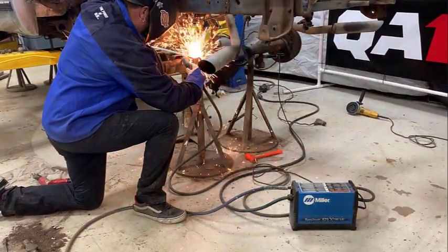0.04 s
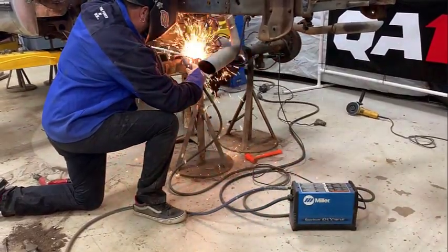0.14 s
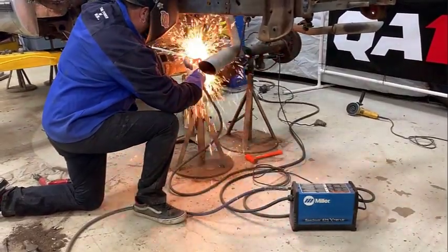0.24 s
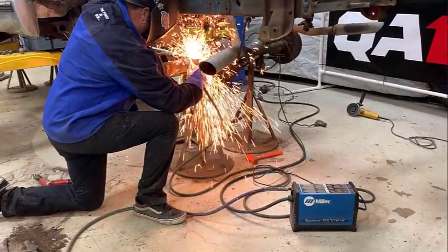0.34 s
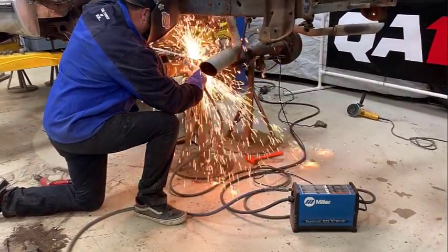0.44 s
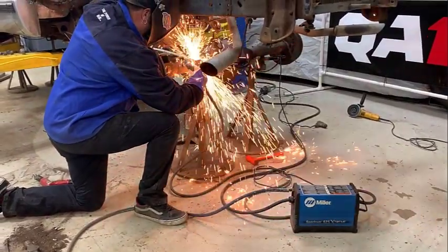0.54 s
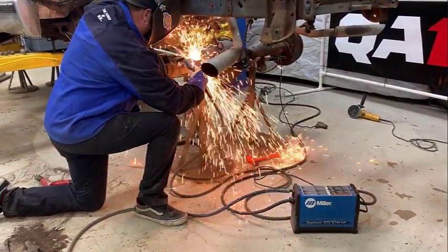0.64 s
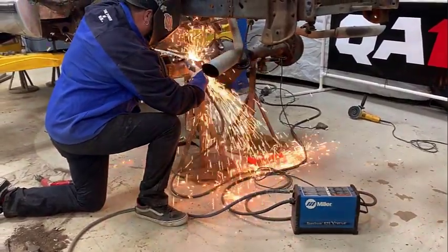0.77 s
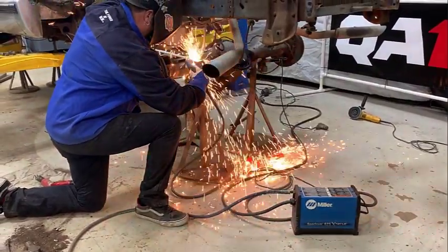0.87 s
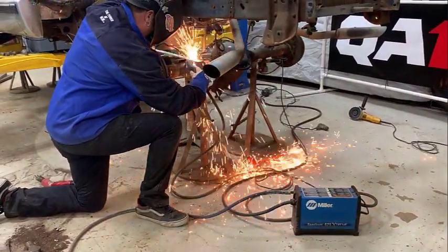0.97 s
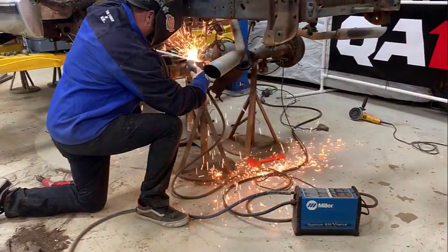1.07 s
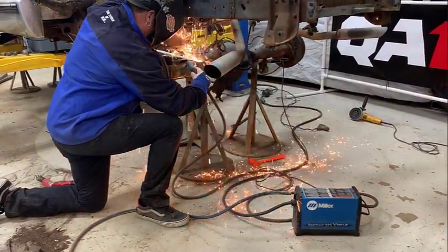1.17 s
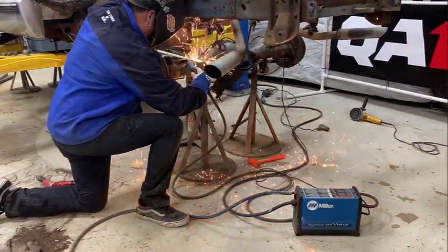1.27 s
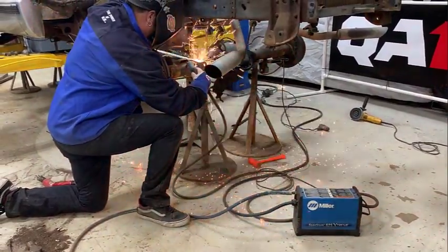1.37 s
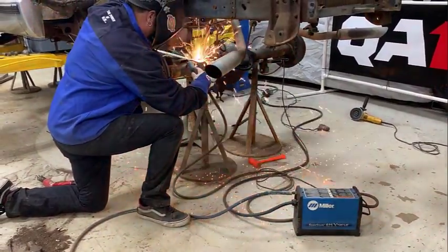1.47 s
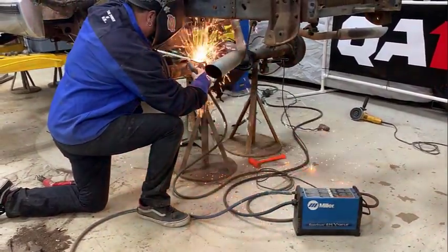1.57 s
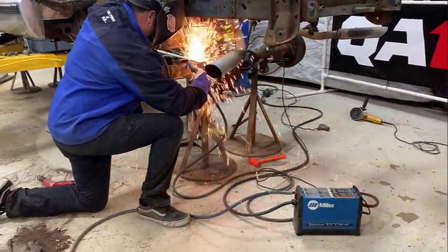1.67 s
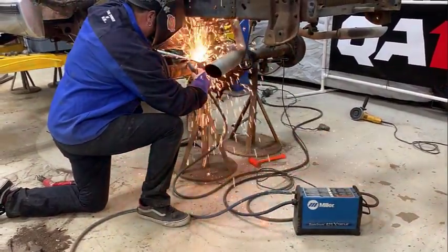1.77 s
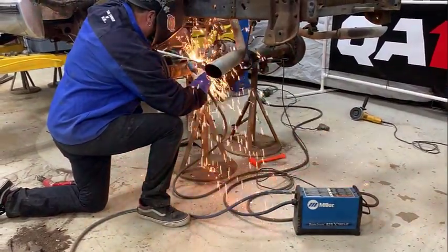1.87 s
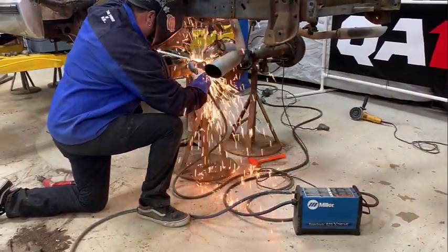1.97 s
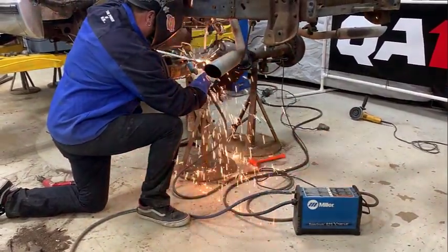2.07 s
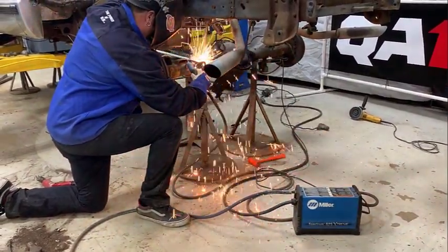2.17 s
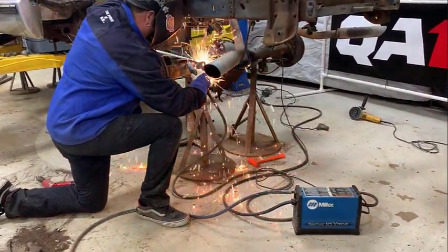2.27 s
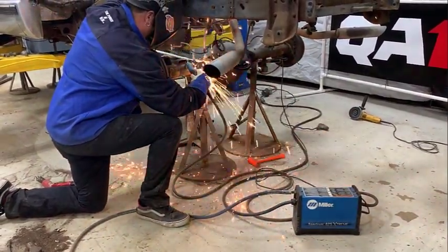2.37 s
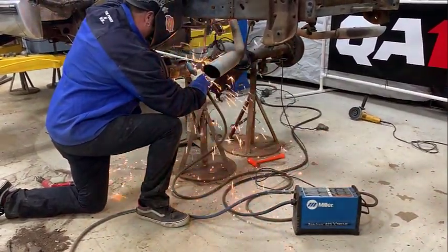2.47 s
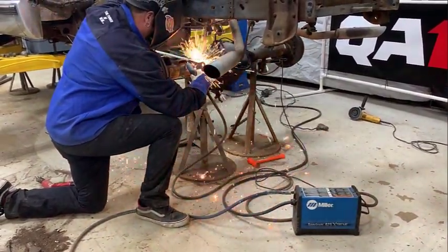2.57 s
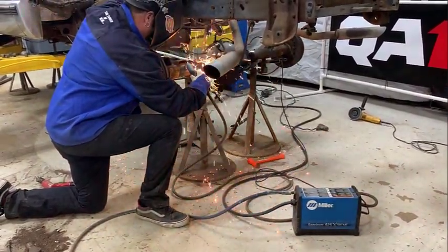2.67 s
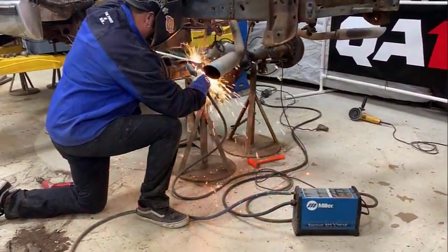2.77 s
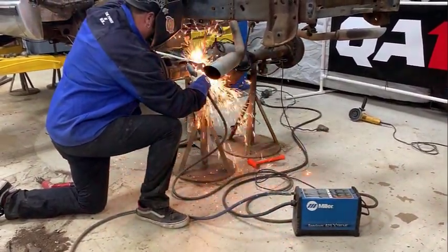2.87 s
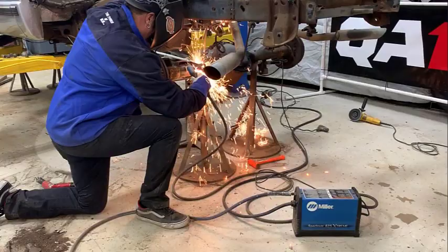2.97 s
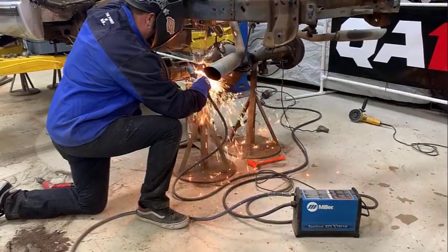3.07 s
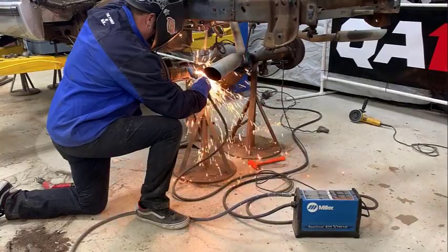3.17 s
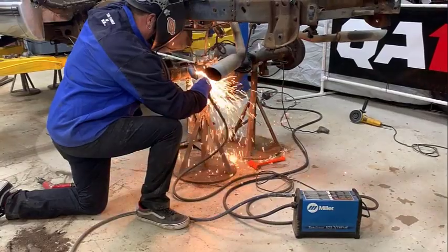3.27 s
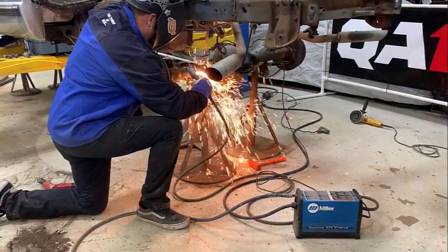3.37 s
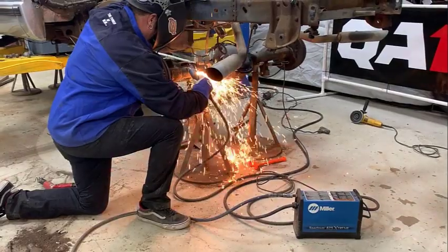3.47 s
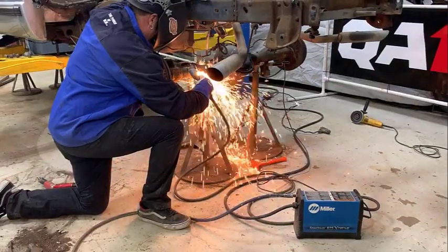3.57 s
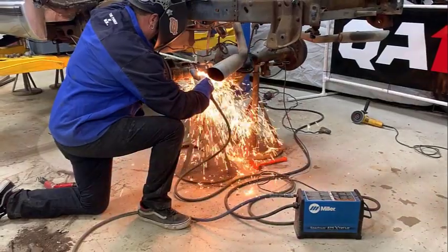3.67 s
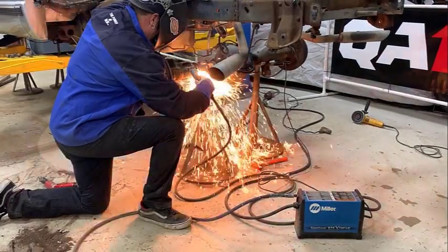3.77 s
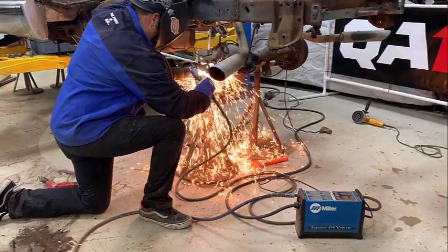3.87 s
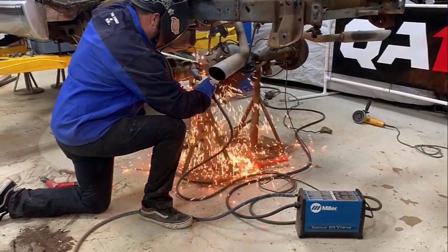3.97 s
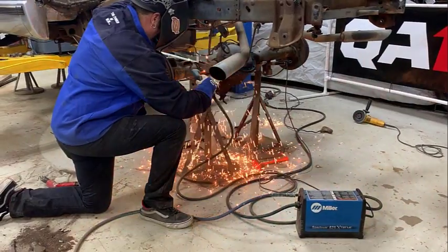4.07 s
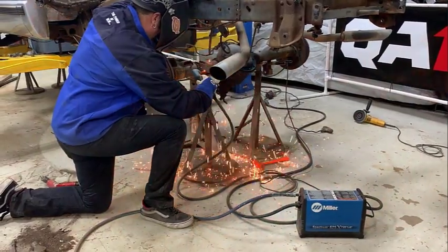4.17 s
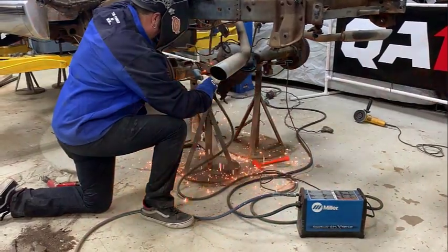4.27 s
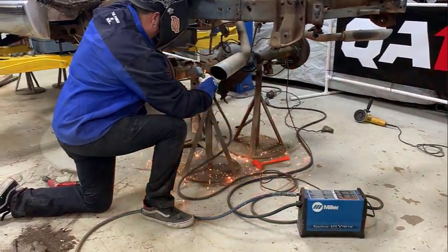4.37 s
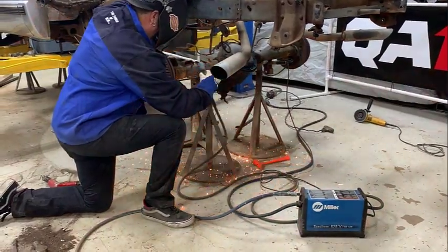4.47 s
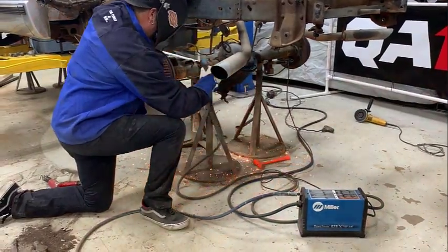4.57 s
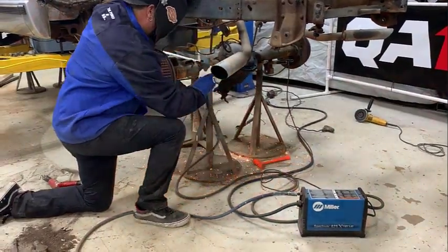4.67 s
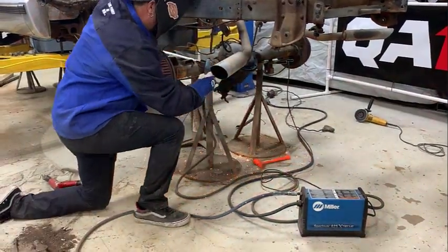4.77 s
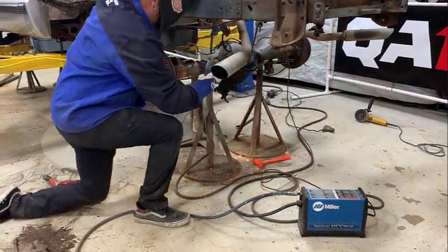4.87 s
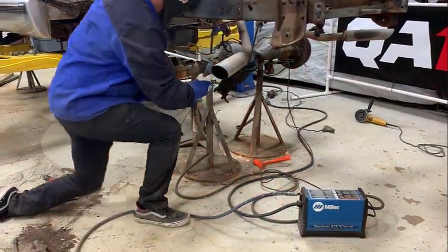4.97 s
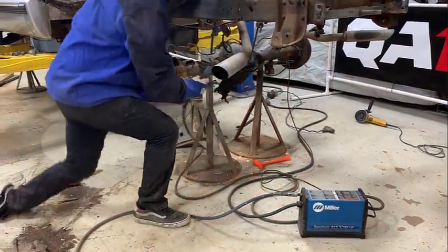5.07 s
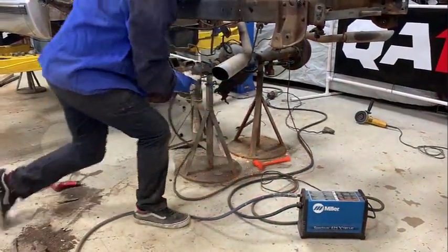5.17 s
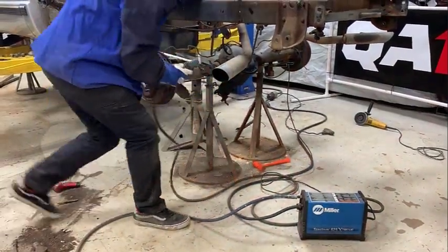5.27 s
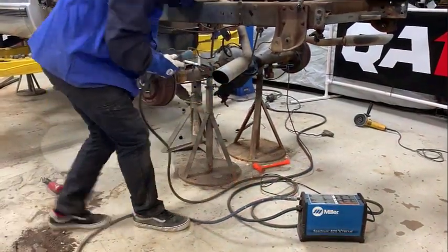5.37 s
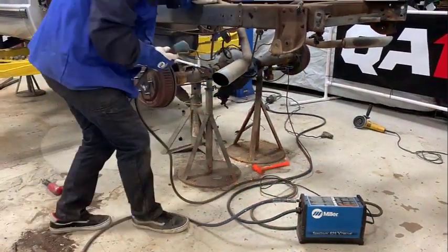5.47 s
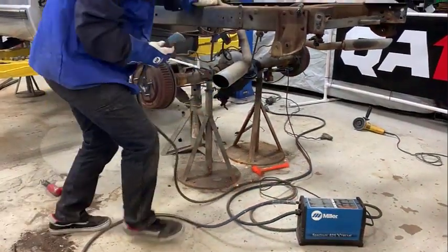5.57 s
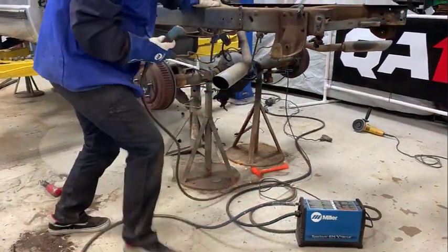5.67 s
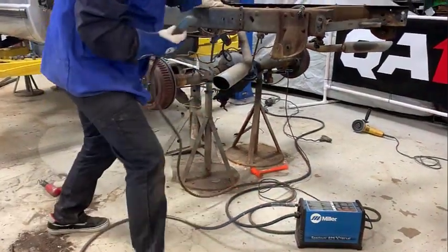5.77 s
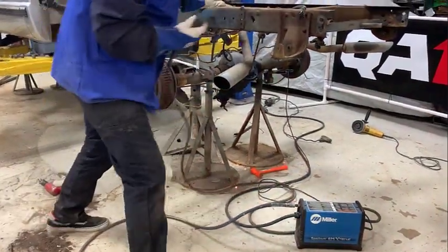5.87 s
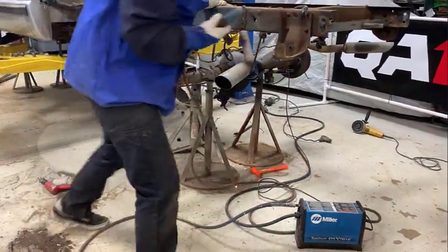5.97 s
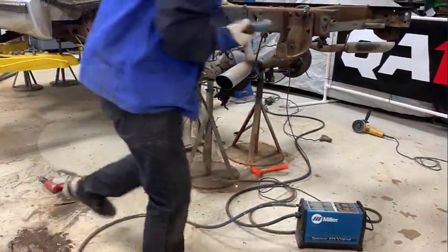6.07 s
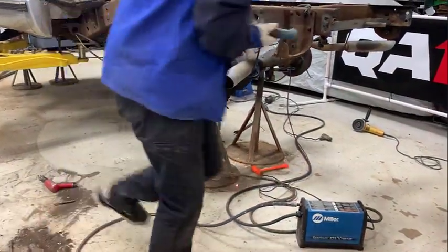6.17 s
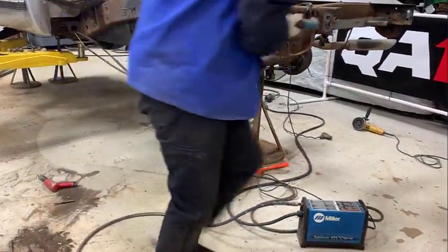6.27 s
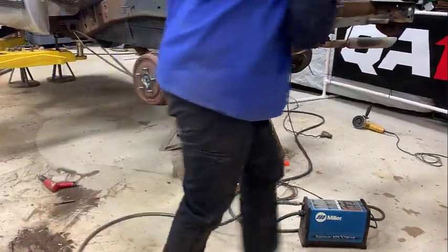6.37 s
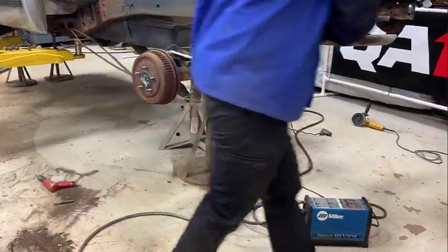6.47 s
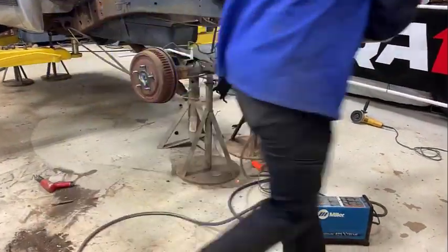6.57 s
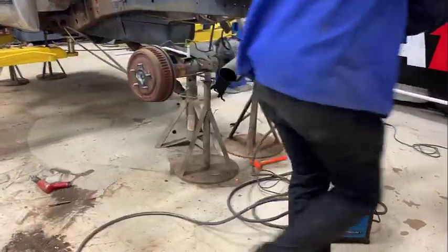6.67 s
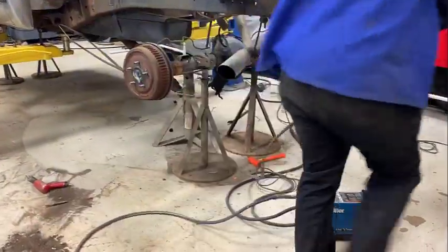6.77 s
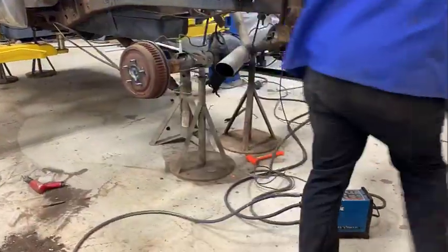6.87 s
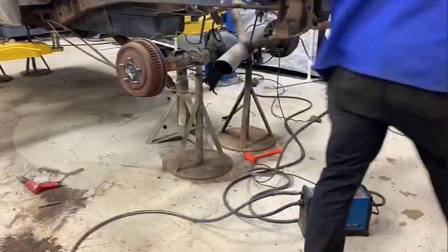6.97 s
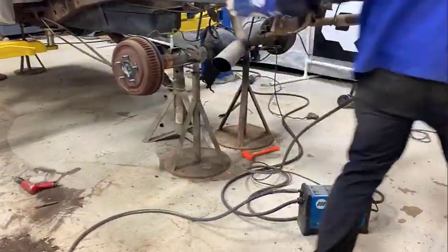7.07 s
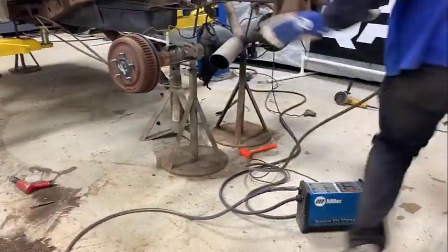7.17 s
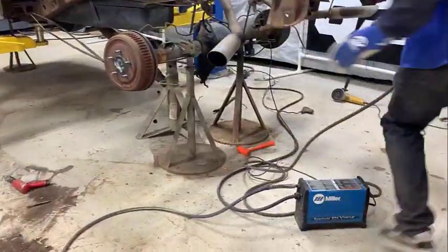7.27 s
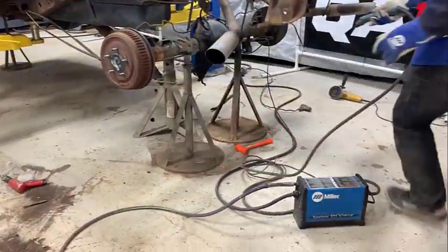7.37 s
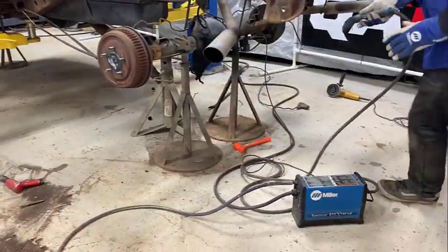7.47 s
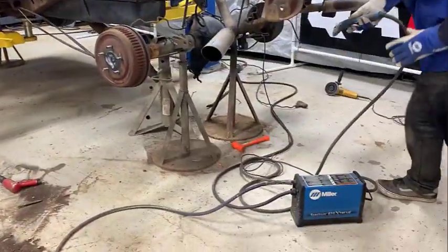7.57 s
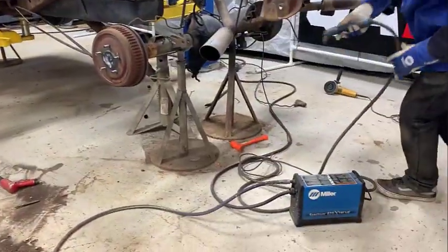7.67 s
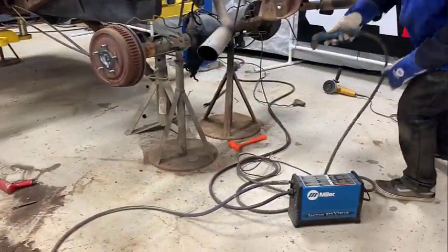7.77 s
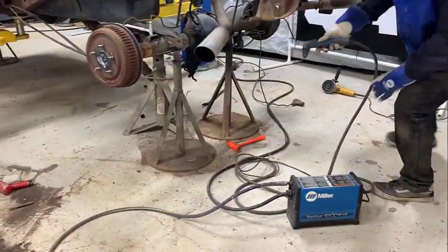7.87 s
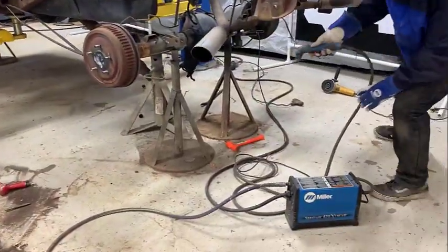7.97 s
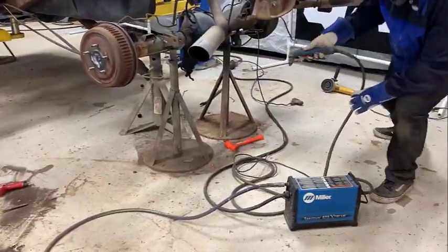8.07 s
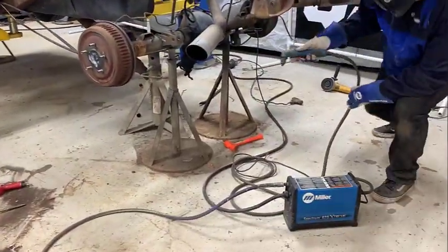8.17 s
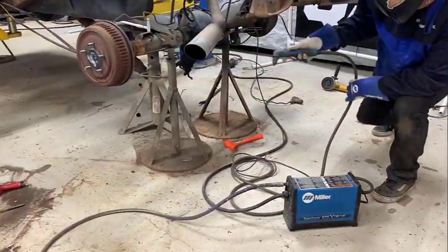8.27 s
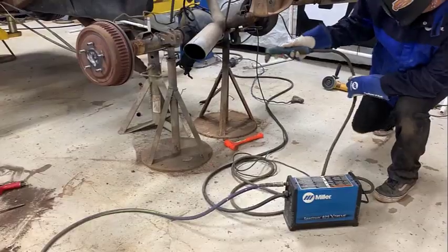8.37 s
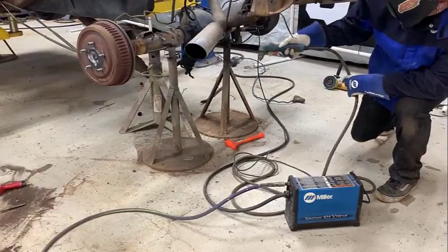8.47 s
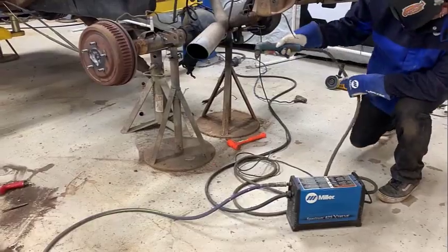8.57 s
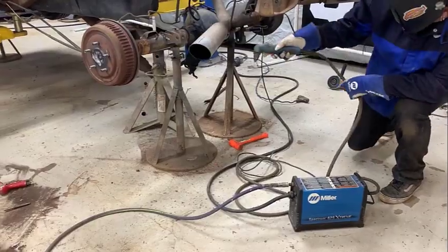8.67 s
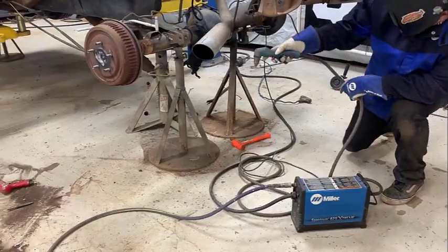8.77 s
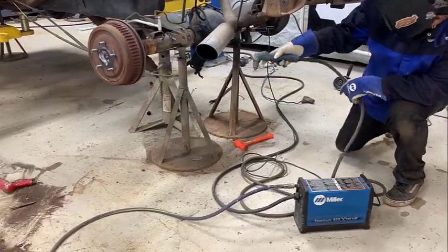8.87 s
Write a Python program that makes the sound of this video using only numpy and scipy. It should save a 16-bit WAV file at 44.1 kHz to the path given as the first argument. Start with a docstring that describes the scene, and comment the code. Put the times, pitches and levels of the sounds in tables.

```python
"""A plasma arc roars through steel over a compressor's hum, a fan's whine and the rush of machines in a workshop.
It growls, snaps off and rings out in the hall; hose air hisses until a valve shuts, then cooling air hisses
as the torch is lifted off and carried past. Jets are noise through changing filters; compressor and fan are sines,
the machines shaped noise, the arc break and thuds damped tones. Both channels carry the same signal."""
import sys
import numpy as np
from scipy import signal
from scipy.fft import rfft, irfft
from scipy.io import wavfile
from scipy.ndimage import uniform_filter1d

SR = 44100
rng = np.random.default_rng(int(sys.argv[2]) if len(sys.argv) > 2 else 0)


def generate_wav(sig):
    """Save sig (samples, or channels by samples) to the path in sys.argv[1] as 16-bit PCM at SR."""
    pcm = np.round(np.clip(np.atleast_2d(sig).T, -1, 1) * 32767).astype(np.int16)
    wavfile.write(sys.argv[1], SR, pcm)


N = 393813
ARC_OFF_S = 4.0


def from_db(db):
    """Amplitude gain of a level in dB."""
    return 10 ** (np.asarray(db) / 20)


def rms_one(x):
    """Scale to rms 1."""
    return x / np.sqrt(np.mean(x ** 2) + 1e-20)


def in_time(rows, t=None):
    """Columns of a time table, interpolated sample by sample or at times t."""
    times_s, *columns = np.transpose(rows)
    at_s = np.arange(N) / SR if t is None else t
    return [np.interp(at_s, times_s, column) for column in columns]


def at_hz(points, hz):
    """Spectrum in dB, interpolated on a log frequency axis."""
    points_hz, points_db = np.array(points)[:, 0], np.array(points)[:, 1]
    return np.interp(np.log(hz + 1), np.log(points_hz), points_db)


def drift(rate_hz):
    """Slow random wander of spread 1: noise through a two-pole lowpass, run at SR / 40."""
    step, settle = 40, 2000
    pole = np.exp(-2 * np.pi * rate_hz * step / SR)
    noise = rng.standard_normal(N // step + settle + 2)
    slow = signal.lfilter([1], [1, -2 * pole, pole * pole], noise)[settle:]
    slow = rms_one(slow - slow.mean())
    return np.interp(np.arange(N) / step, np.arange(len(slow)), slow)


def resonance(hz, centre_hz, width_hz):
    """Power response of a resonance passed twice."""
    return 1 / (1 + (2 * (hz - centre_hz) / width_hz) ** 2) ** 2


def lifts_db(events, hz, t):
    """Brief swells (or dips, if negative) of single bands."""
    total_db = 0
    for centre_s, length_s, centre_hz, width_hz, db in events:
        swell = np.exp(-(2 * (t - centre_s) / length_s) ** 2)
        total_db = total_db + db * swell * resonance(hz, centre_hz, width_hz)
    return total_db


def coloured(colour_db, patchy_db, streaky_db):
    """White noise of rms 1 through a changing filter colour_db(Hz, s); eddies make broad short patches,
    slowly shifting echoes from nearby steel make narrow long streaks."""
    window, hop = 1024, 256  # samples
    hz, t, z = signal.stft(rng.standard_normal(N), SR, nperseg=window, noverlap=window - hop)

    def field(bins, frames):
        noise = uniform_filter1d(rng.standard_normal(z.shape), bins, axis=0)
        return rms_one(uniform_filter1d(noise, frames, axis=1))

    chance_db = patchy_db * field(bins=24, frames=16) + streaky_db * field(bins=4, frames=120)
    gain = from_db(colour_db(hz[:, None], t[None]) + chance_db)
    return signal.istft(z * gain, SR, nperseg=window, noverlap=window - hop)[1][:N]


def jet():
    """Turbulent hiss whose resonances change strength as the torch moves along the cut."""
    # cutting jet: (time [s], hiss before makeup [dB], roar below about 3 kHz relative to it [dB])
    cut = [(0.0, -15, -3.5), (0.2, -19, 1.5), (0.55, -20.5, 2.5), (0.77, -19, 3), (0.79, -17, 0.5),
           (0.9, -20, -2), (1.58, -19.5, 0.5), (1.82, -17, -3), (2.07, -21, -3), (2.2, -18.5, 0),
           (2.28, -22.5, 4.5), (2.74, -18.5, 0), (3.18, -23.5, 0.5), (3.24, -21.5, 1), (3.6, -25.5, -1.5),
           (3.78, -21.5, -2), (3.9, -23.5, 2.5), (3.99, -17.5, 3.5)]
    # jet bands briefly swelling, or sinking where negative:
    # (time [s], length [s], centre [Hz], width [Hz], lift [dB])
    surges = [(.09, 0.078, 4000, 600, -2), (.8, .2, 4700, 700, 3.5), (.72, .25, 7000, 700, -0.5),
              (1.76, 0.11, 3850, 900, 4.5), (1.85, 0.14, 7500, 900, 5), (2.27, 0.098, 1910, 400, 1),
              (2.3, 0.15, 1100, 150, 10), (2.9, .3, 5500, 500, -0.5)]
    # start, middle and end of the cut: time [s]
    cut_stages_s = [0.7, 2.78, 3.6]
    # steel and cavities around the torch: (centre [Hz], width [Hz], start [dB], middle [dB], end [dB])
    rings = [(587, 276, -1.5, 1, 2.5), (1020, 1540, -12.5, -11, -4.5), (1400, 420, -6, -5.5, -7),
             (1670, 290, -5, -2, 3), (1924, 180, -1.5, 3.5, 2), (2440, 530, -4.5, -2.5, 2.5),
             (3055, 280, -5, -10.5, -4), (3440, 670, -2, -1, -0.5), (3990, 380, 5.5, -1.5, -5),
             (4280, 1370, -16.5, 2.5, 1.5), (4720, 900, 0.5, -3, -25.0), (5606, 920, 2.0, 6, 6),
             (6360, 690, 1, 0.5, -1.5), (6910, 830, 3.5, 2, 2.5), (7610, 1080, 3.5, 3, 0.5),
             (8200, 570, -5, -3, -1.5), (8720, 480, -2, 1, -16), (9030, 490, -8, -10, 1),
             (9500, 650, -9, -2.5, -5), (10240, 610, 1.5, 0, 0.5), (10820, 540, 1.0, 7, 3),
             (11490, 680, 2, 1.5, 0.5), (12600, 770, -3, -15.0, -7), (13200, 870, -3, 1, -3),
             (14100, 850, -15, -10, -4), (14600, 530, -9.5, -15.0, -11.5), (15100, 1200, -13.0, -16, -16)]
    makeup_db, fade_s = 2.5, 0.013

    def colour_db(hz, t):
        power = 0
        for centre_hz, width_hz, *stages_db in rings:
            ring_db = np.interp(t, cut_stages_s, stages_db)
            power = power + from_db(2 * ring_db) * resonance(hz, centre_hz, width_hz)
        roar_db = in_time(cut, t)[1] / (1 + (hz / 2800) ** 6)
        return 10 * np.log10(power) + lifts_db(surges, hz, t) + roar_db

    burning = np.clip((ARC_OFF_S - np.arange(N) / SR) / fade_s, 0, 1)
    flutter_db = 0.5 * drift(8.6) + 0.47 * drift(37)
    gain = from_db(in_time(cut)[0] + makeup_db + flutter_db) * burning
    return coloured(colour_db, patchy_db=0.85, streaky_db=1.56) * gain


def hall(x):
    """Dense dull reverberation after a short gap: decaying, lowpassed noise as impulse response."""
    t60_s, dull_hz, gap_s = 1.3, 8150, 0.015
    age_s = np.arange(2 * SR) / SR
    tail = rng.standard_normal(len(age_s)) * from_db(-60 * age_s / t60_s) * (age_s > gap_s)
    tail = signal.sosfilt(signal.butter(2, dull_hz, fs=SR, output="sos"), tail)
    return signal.fftconvolve(x, tail / np.sqrt(np.sum(tail ** 2)))[:N]


def compressor():
    """Overtones of the stroke rate; the standing waves they form change when the worker moves."""
    # 17th and 16th multiples, a hum shifting as the worker moves: (time [s], 17th [dB], 16th [dB])
    hum = [(0, -41, -46), (.12, -34, -41), (.3, -45.5, -42), (.75, -40.5, -40), (2.0, -40.5, -41),
           (3.2, -41, -39.5), (4.4, -40, -40), (4.95, -46, -46), (5.15, -39, -55), (5.4, -36.5, -55),
           (5.6, -50, -54), (5.8, -50, -38.5), (6.05, -43.5, -45), (6.75, -37, -48), (7.08, -44.5, -56),
           (7.2, -34, -46), (7.6, -33, -54), (8.2, -35, -51), (8.93, -35.5, -50)]
    # worker kneels, walks past, stands opposite: time [s]
    worker_stages_s = [4.2, 6.4, 7.68]
    # other overtones: (multiple of stroke rate, kneeling [dB], walking past [dB], opposite [dB])
    overtones = [(1, -64, -54.5, -56), (2, -53.5, -53, -57), (3, -66, -72, -58.5), (4, -68, -63, -66),
                 (5, -68, -63, -72), (7, -73, -58, -57), (8, -55.5, -71, -72), (9, -57.5, -53, -62),
                 (10, -52, -59, -62), (11, -56.5, -65, -64), (12, -55.5, -54, -50), (13, -54, -52, -62),
                 (14, -59, -55, -61), (15, -48, -56, -51), (18, -47, -55, -58), (19, -58, -60, -56),
                 (35, -51.5, -59, -53), (43, -54.5, -55, -58)]
    stroke_hz, hum_waver_db = 25.122, 1.5

    t = np.arange(N) / SR
    turn = 2 * np.pi * (stroke_hz * t + 0.0039 * drift(0.63))

    def overtone(multiple, level_db, phase):
        return from_db(level_db) * np.sqrt(2) * np.sin(multiple * turn + phase)

    upper_db, lower_db = in_time(hum)
    out = overtone(17, upper_db + hum_waver_db * drift(3.0), 0)
    out += overtone(16, lower_db + hum_waver_db * drift(3.0), rng.uniform(0, 2 * np.pi))
    for multiple, *stages_db in overtones:
        level_db = np.interp(t, worker_stages_s, stages_db) + 1.0 * drift(0.69)
        out += overtone(multiple, level_db, rng.uniform(0, 2 * np.pi))
    return out


def fan():
    """Thin tone with a faint octave; speeds up during the cut, runs on, then settles to a throbbing idle."""
    # whine: (time [s], frequency [Hz], level before throb [dB])
    whine = [(0, 904, -49), (1.0, 1000, -43), (1.7, 1056, -53), (2.3, 1107, -46), (2.8, 1170, -53),
             (3.3, 1210, -48), (4.2, 1255, -55.5), (4.85, 1243, -42), (5.15, 1211, -56), (5.5, 1130, -44),
             (5.85, 1106, -47), (6.17, 1082, -44.5), (6.27, 1078, -56), (6.9, 1080, -49), (7.8, 1079, -51),
             (8.93, 1077, -60)]
    throb_from_s, throb_period_s, throb_db = 6.15, 0.82, 6
    hz, db = in_time(whine)
    # clipped a quarter period early, where the cosine is zero
    idle_s = np.clip(np.arange(N) / SR - throb_from_s, -throb_period_s / 4, None)
    db = db + throb_db * np.cos(2 * np.pi * idle_s / throb_period_s)
    turn = 2 * np.pi * np.cumsum(hz + 2.0 * drift(5.3)) / SR
    octave = from_db(-17 + 3 * drift(1.5)) * np.sin(2 * turn)
    return from_db(db + 0.92 * drift(3.7)) * np.sqrt(2) * (np.sin(turn) + octave)


def shop():
    """Broad rush of the machines over a faint hiss and lumpy rumble; thuds lift rush and rumble briefly."""
    # spectrum of the rush: (frequency [Hz], relative density [dB per Hz])
    rush_colour = [(12, -51), (20, -18), (51, -18.5), (135, -21.5), (299, -8), (349, -7), (417, -6),
                   (520, -6), (866, -8), (968, -13.5), (1080, -10), (1160, -13), (1760, -17), (2200, -18),
                   (4000, -36), (5200, -32), (8800, -120)]
    # rush: (time [s], level [dB])
    rush_level = [(0, -45), (1.1, -37), (2.1, -33.5), (2.4, -40), (4.1, -35), (4.5, -37), (5.2, -36.5),
                  (7.1, -40), (8.93, -36)]
    # rumble, swelling by 5.5 s, sinking near 6.8 s, then returning: (time [s], level [dB])
    rumble_level = [(0, -59), (4.5, -56), (5.5, -51), (6.8, -63), (7.7, -55), (8.93, -53)]
    hiss_db, thud_hz = -48, 47

    white, hz = rfft(rng.standard_normal((2, N))), np.fft.rfftfreq(N, 1 / SR)
    rush = rms_one(irfft(white[0] * from_db(at_hz(rush_colour, hz)), N))
    rumble_gain = (hz > 18) * hz / (hz + 40) / (1 + (hz / 90) ** 2)
    rumble = rms_one(irfft(white[1] * rumble_gain, N))
    hiss = from_db(hiss_db) * rng.standard_normal(N)

    rush *= from_db(in_time(rush_level)[0] + 0.58 * drift(13.0)) + thuds(2)
    rumble *= from_db(in_time(rumble_level)[0] + 1.4 * drift(2.7)) + thuds(1)
    return rush + rumble + thuds(1, thud_hz) + hiss


def arc_break():
    """The arc stretches: noise in a low resonance swells; then short damped pops end it."""
    # growl: (time [s], level before fade-in [dB])
    growl = [(3.8, -40), (3.88, -36), (3.92, -23), (3.945, -23.5), (3.96, -15.5), (3.975, -34),
             (3.99, -19.5), (4.0, -25)]
    # pops: (time [s], level [dB], frequency [Hz], 60 dB decay time [s])
    snaps = [(3.991, -4, 420, 0.018), (3.995, -1.5, 915, 0.0051), (4.001, -16, 644, 0.02)]
    growl_hz, width_hz, fade_in_s = 650, 300, 0.17
    t = np.arange(N) / SR
    edges_hz = [growl_hz - width_hz / 2, growl_hz + width_hz / 2]
    band = signal.butter(2, edges_hz, "band", fs=SR, output="sos")
    out = rms_one(signal.sosfilt(band, rng.standard_normal(N))) * from_db(in_time(growl)[0])
    out *= np.clip((t - growl[0][0]) / fade_in_s, 0, 1) * (t < ARC_OFF_S)
    for start_s, db, hz, t60_s in snaps:
        age_s = np.clip(t - start_s, 0, 1)
        out -= from_db(db - 60 * age_s / t60_s) * np.sin(2 * np.pi * hz * age_s)
    return out


def thuds(column, hz=0):
    """Arc's blast, worker rising and steps: quick rise, then decay, as a gain or ringing at hz."""
    # thuds: (time [s], low thud [dB], broad rush [dB])
    events = np.array([(3.98, -43, -25), (4.451, -50, -51), (4.81, -38.5, -39), (4.89, -38, -40),
                       (4.96, -36, -31), (5.55, -44, -49), (7.14, -60, -50), (7.62, -50, -50),
                       (7.84, -44, -39), (7.95, -50, -61), (8.16, -50, -59), (8.52, -48, -60)])
    rise_s, t60_s = 0.013, 0.27
    age_s = (np.arange(N) / SR - events[:, :1]).clip(0)
    envelope = np.clip(age_s / rise_s, 0, 1) * from_db(-60 * age_s / t60_s)
    return from_db(events[:, column]) @ (envelope * np.cos(2 * np.pi * hz * age_s))


def bleed():
    """Air left in the hose still hisses in the kerf, fading, until the valve shuts."""
    # kerf resonances: (centre [Hz], width [Hz], level [dB])
    rings = [(4100, 900, -39), (5650, 600, -29), (6650, 900, -34), (7500, 760, -34), (10700, 900, -38)]
    valve_shut_s, fade_db_per_s = 4.29, -13.0

    def colour_db(hz, t):
        power = sum(from_db(2 * db) * resonance(hz, centre_hz, width_hz) for centre_hz, width_hz, db in rings)
        return 10 * np.log10(power) + 0 * t

    t = np.arange(N) / SR
    open_valve = (t > ARC_OFF_S - 0.01) * np.clip((valve_shut_s - t) / 0.015, 0, 1)
    fade = from_db(fade_db_per_s * (t - ARC_OFF_S).clip(0, 1))
    return coloured(colour_db, patchy_db=3.0, streaky_db=1.0) * open_valve * fade


def cooling_air():
    """Smooth bright hiss; nozzle aim and the worker's body decide how much treble and rush are heard."""
    # free jet: (time [s], hiss [dB], treble relative to hiss [dB], low rush relative to hiss [dB])
    air = [(4.46, -63, -3, 12), (4.55, -44, -8, 6), (4.65, -47, 3, 1), (4.7, -38, -10, -2.5),
           (4.83, -41, -10, 8), (4.93, -43, -7, 10), (5.06, -43.5, -8, -6), (5.18, -43.5, 5, -1),
           (5.31, -41.5, -7, -13), (5.47, -49, 4, 4), (5.65, -42, -17, 1.5), (5.74, -42.5, -6, 2),
           (5.79, -45.5, -11, 6.5), (6.21, -37, -5, -2), (6.74, -39.5, -3, -3.5), (7.0, -44.5, 4, 3),
           (7.25, -44, -7, 0.5), (7.34, -52, -10, 11), (7.61, -52, 3, 12.5), (8.0, -45, -4, -8),
           (8.37, -47.5, -2, 6.5), (8.52, -44, -7, 3), (8.9, -45, -9, 1), (8.93, -47, -4, 1)]
    # skirt, rush, middle, hiss (three points), treble, skirt: frequency [Hz]
    bands_hz = [1100, 2300, 4500, 6900, 8300, 10500, 13000, 15600]
    # offset at those points: [dB per Hz]
    band_offsets_db = np.array([8, 6, 4, 5.5, 8.5, 7.5, 9, -3])
    # air sweeping over edges and hollows: (time [s], length [s], centre [Hz], width [Hz], lift [dB])
    gusts = [(4.57, .14, 2400, 900, 8.5), (4.55, .06, 4500, 900, 11), (4.66, .04, 2450, 898, 5),
             (4.67, 0.064, 6530, 1100, 12.5), (4.73, 0.084, 7200, 1000, 13), (4.76, 0.08, 4400, 1000, 7),
             (4.84, 0.13, 2680, 1290, 6), (4.884, 0.04, 5500, 1200, 4), (5.0, 0.11, 1300, 1200, 6),
             (7.7, .35, 2164, 500, 10), (8.65, .5, 1450, 400, 9)]
    # moving band of the air hiss: (time [s], centre [Hz], width [Hz], cut [dB], negative lifts it)
    moving_band = [(5.2, 3200, 1503, -7), (5.35, 3400, 1500, 3), (5.5, 4400, 2200, 10),
                   (5.8, 6190, 2000, 13), (5.98, 4800, 2000, 4), (6.25, 5800, 2600, 16),
                   (6.6, 5600, 2200, 10), (7.1, 5400, 2004, 3), (7.35, 4300, 3000, 7),
                   (7.55, 5800, 4010, 11), (7.75, 4300, 2000, 10), (7.92, 4300, 1500, 2),
                   (8.1, 3530, 1500, 8), (8.35, 4490, 1500, -4), (8.6, 4500, 1500, -5)]
    # air striking the steel while the torch is lifted away: (time [s], level [dB])
    splash_level = [(4.49, -50), (4.502, -53), (4.508, -40), (4.55, -38), (4.626, -40), (4.654, -32),
                    (4.826, -28.5), (4.896, -31), (4.952, -39), (5.3, -39.5)]
    # spectrum of the splash: (frequency [Hz], relative density [dB per Hz])
    splash_colour = [(530, -34), (900, 5), (1100, -12), (1220, -3), (1460, -16), (1600, -5), (2080, -1),
                     (2990, -1), (3440, -6), (4010, -2), (7060, -4.5), (15000, -24)]
    middle_follows_rush = 0.25  # share; the rest follows the hiss

    def colour_db(hz, t):
        hiss, treble, rush = in_time(air, t[0])
        flat = 0 * rush
        parts = np.array([rush, rush, middle_follows_rush * rush, flat, flat, flat, treble, treble])
        levels = hiss + parts + band_offsets_db[:, None]
        share = [np.interp(hz[:, 0], bands_hz, one) for one in np.eye(len(levels))]
        free = np.transpose(share) @ levels
        centre_hz, width_hz, cut_db = in_time(moving_band, t)
        free -= cut_db * resonance(hz, centre_hz, width_hz)

        tone = at_hz(splash_colour, hz)
        tone -= 10 * np.log10(np.mean(from_db(2 * tone)))  # mean power 1
        die_away_db = 80 * np.clip(t - splash_level[-1][0], 0, 1)
        splash = in_time(splash_level, t)[0] + tone - die_away_db

        low_cut_db = 30 * np.clip(1 - hz / bands_hz[0], 0, 1)
        both = 10 * np.log10(from_db(2 * free) + from_db(2 * splash))
        return both - low_cut_db + lifts_db(gusts, hz, t)

    onset = np.clip((np.arange(N) / SR - air[0][0]) / 0.06, 0, 1)
    return coloured(colour_db, patchy_db=1.63, streaky_db=0.44) * onset


def scene():
    """Torch with its hall echo and dry air jets, over the machines; same signal in both channels."""
    hall_db = -15.5
    torch = jet() + arc_break()
    air = bleed() + cooling_air()
    machines = compressor() + fan() + shop()
    mono = torch + from_db(hall_db) * hall(torch) + air + machines
    return np.array([mono, mono])


def record(dry):
    """Steep elliptic lowpass cuts the top."""
    cutoff_hz, ripple_db, stop_db = 15680, 0.3, 80
    return signal.sosfilt(signal.ellip(14, ripple_db, stop_db, cutoff_hz, fs=SR, output="sos"), dry)


dry = scene()
out = record(dry)
generate_wav(out)
```